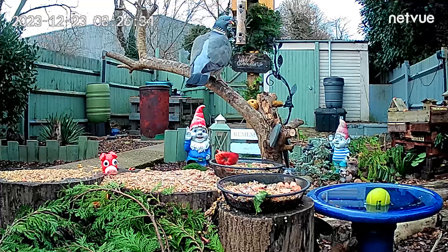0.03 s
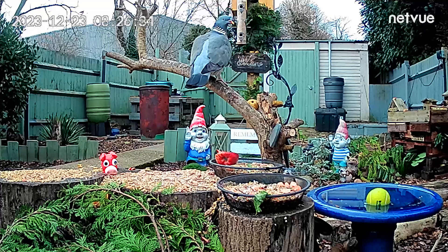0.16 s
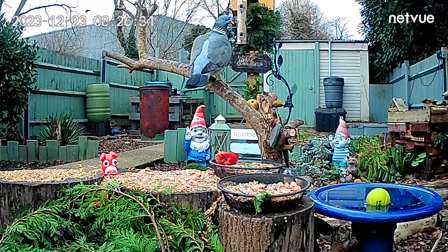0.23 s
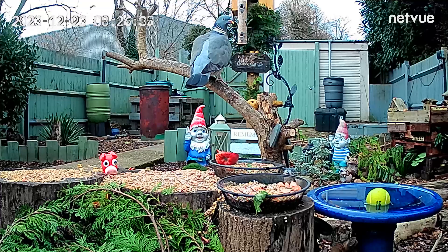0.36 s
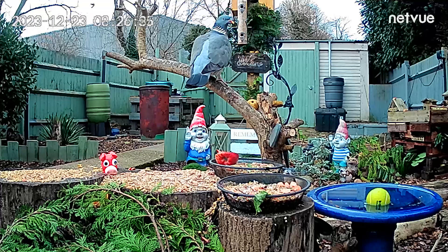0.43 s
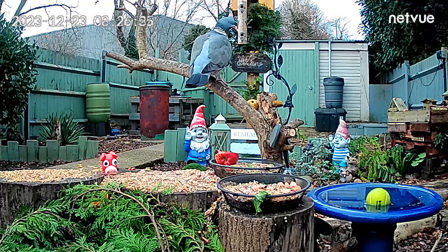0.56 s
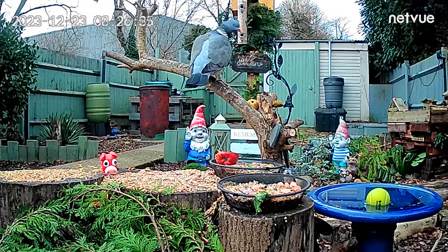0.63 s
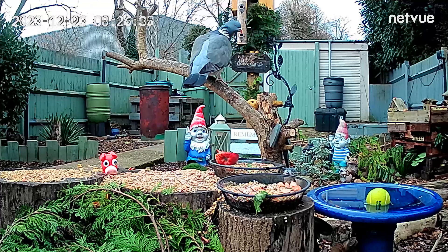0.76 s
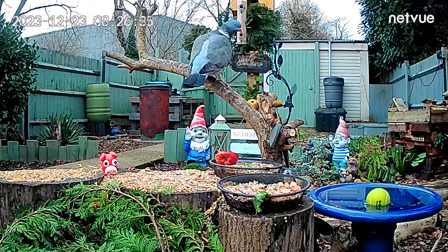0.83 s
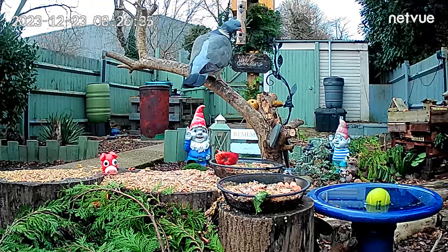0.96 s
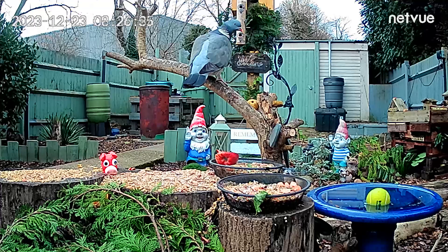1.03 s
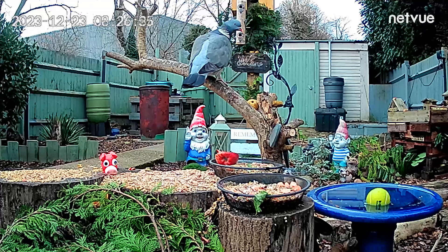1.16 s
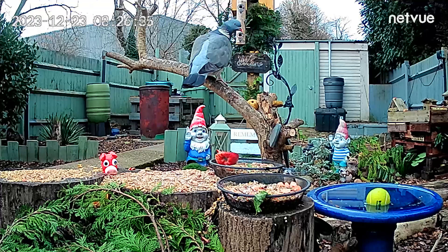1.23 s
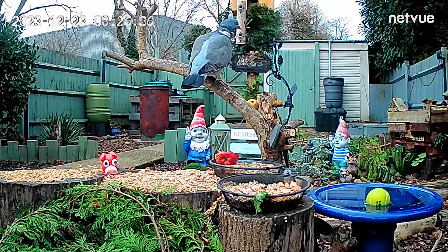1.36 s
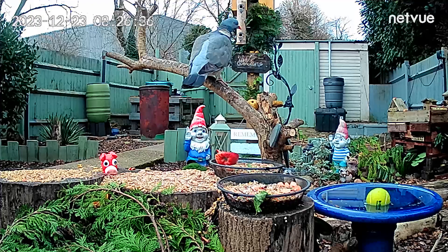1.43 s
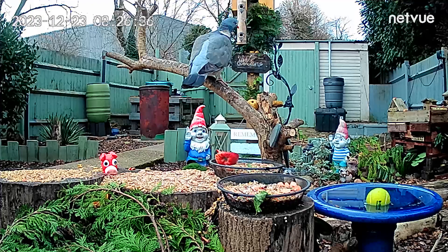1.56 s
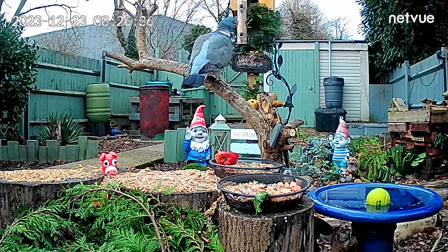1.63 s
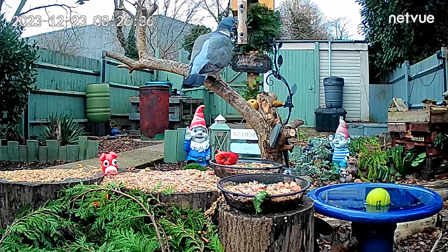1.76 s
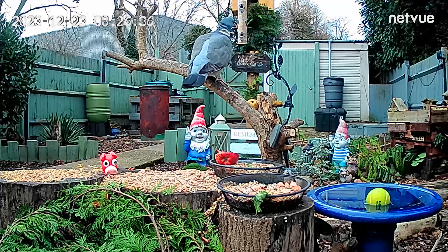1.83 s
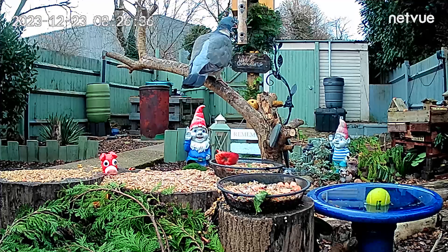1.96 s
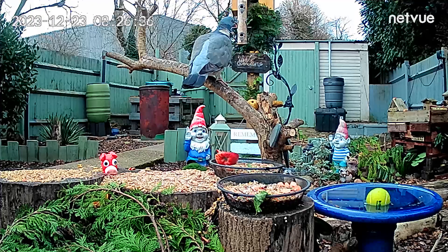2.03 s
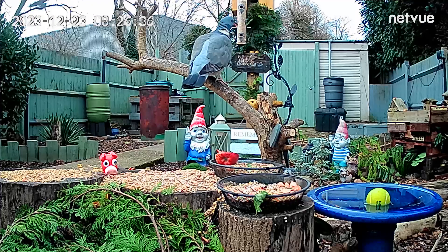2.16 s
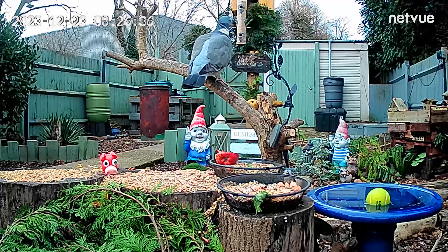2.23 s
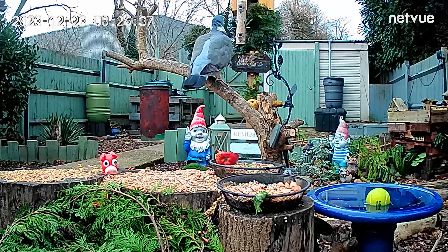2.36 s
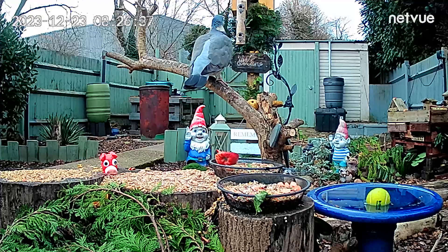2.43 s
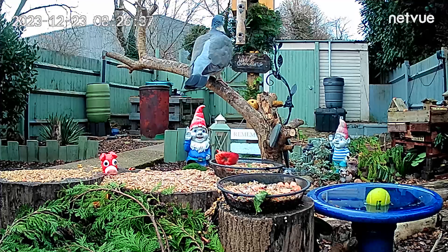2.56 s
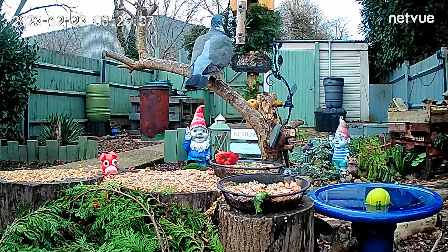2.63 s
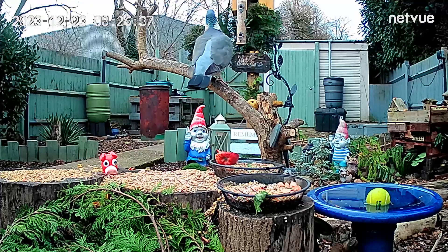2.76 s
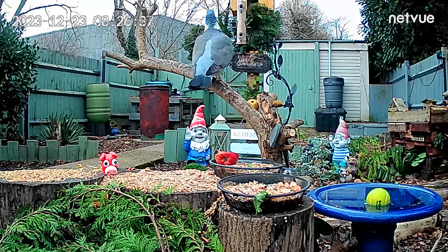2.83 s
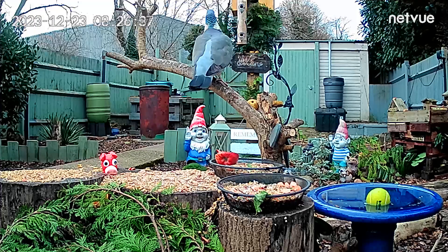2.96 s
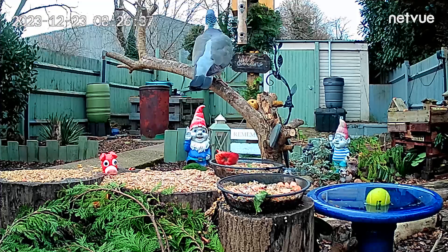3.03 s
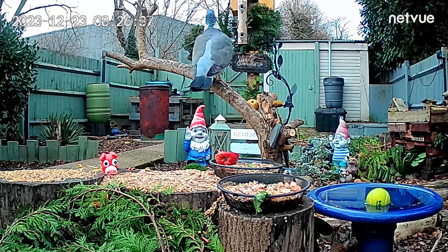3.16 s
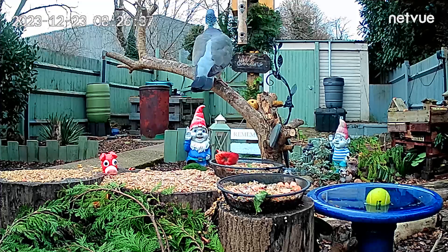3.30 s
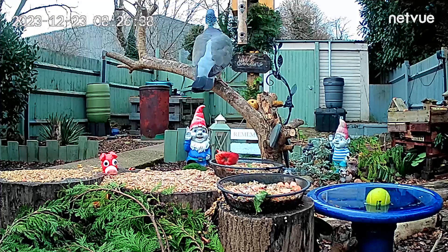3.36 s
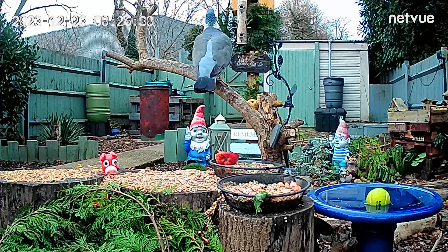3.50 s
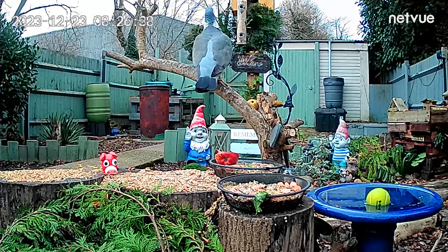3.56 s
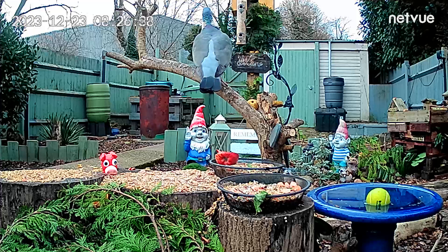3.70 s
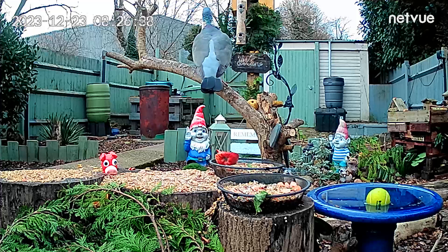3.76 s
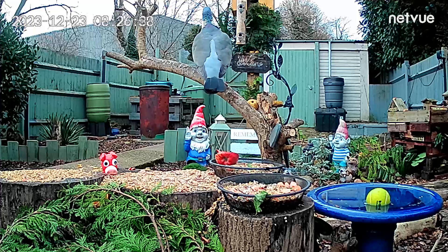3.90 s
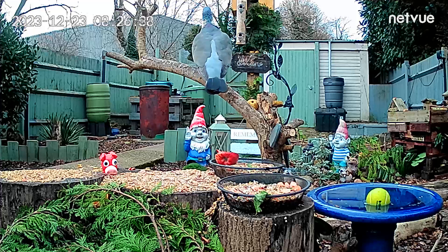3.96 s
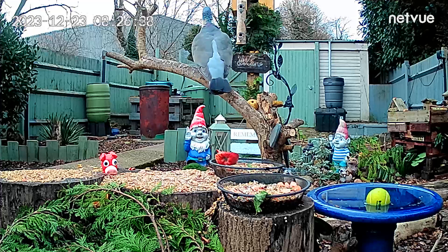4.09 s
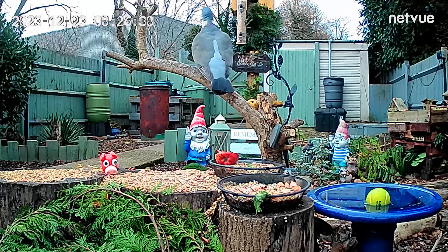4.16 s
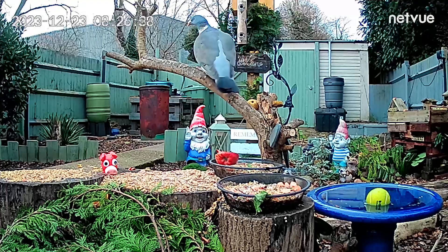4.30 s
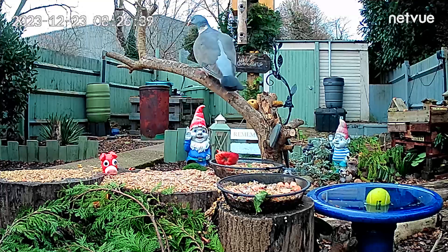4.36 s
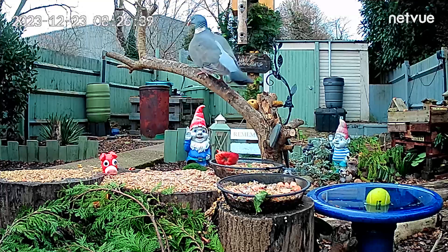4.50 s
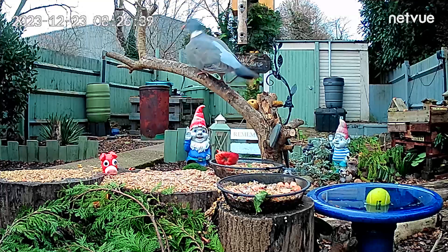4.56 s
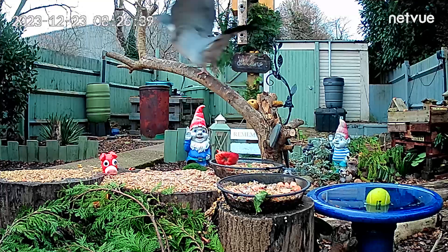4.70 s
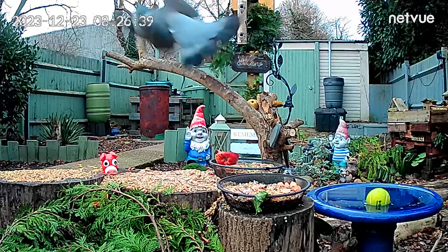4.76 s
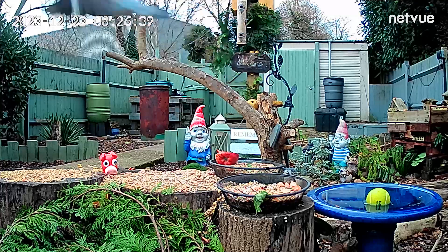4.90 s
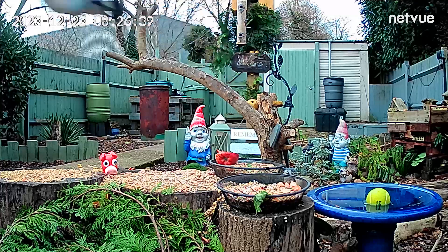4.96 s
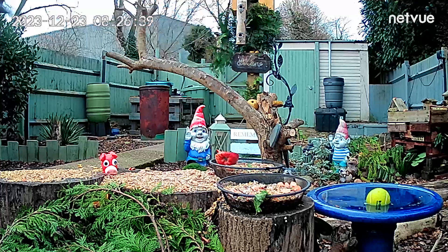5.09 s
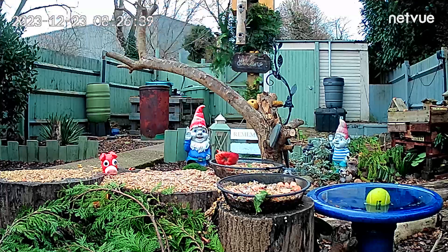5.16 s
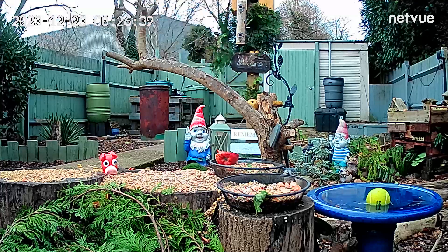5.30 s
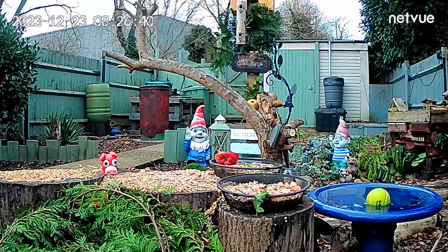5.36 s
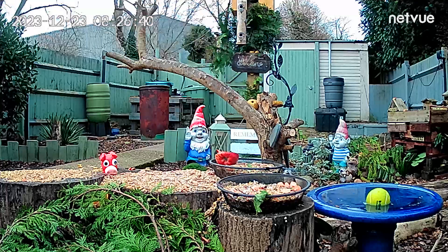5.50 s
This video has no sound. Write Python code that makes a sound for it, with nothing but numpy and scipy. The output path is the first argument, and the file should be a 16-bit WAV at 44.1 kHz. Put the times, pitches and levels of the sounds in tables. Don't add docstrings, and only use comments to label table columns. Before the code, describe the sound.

Outdoor mono sound from a small, cheap microphone: steady airy hiss, brief piercing chirps, a raspy buzz and falling whistles with short echoes off fences. After a lull with low wind bumps and hedge rush, a pigeon close by launches in a fast flurry of dry claps, swishes and puffs of air, brightest at first and duller as it leaves, with heavy low wind rumble underneath and a last hard gust.

```python
import sys
import numpy as np
from scipy import signal
from scipy.fft import rfft, irfft, dct, next_fast_len
from scipy.io import wavfile
from scipy.ndimage import uniform_filter1d

SR = 44100
rng = np.random.default_rng(int(sys.argv[2]) if len(sys.argv) > 2 else 0)


def gain_from_db(level_db):
    decades = np.asarray(level_db, float) / 20
    return 10 ** decades


def transcribe(signal):
    frames = np.atleast_2d(signal).T
    limited = np.clip(frames, -1, 1)
    pcm = np.round(limited * 32767).astype(np.int16)
    wavfile.write(sys.argv[1], SR, pcm)


N = 243431
TIME = np.arange(N) / SR

# time in seconds, buffeting level in dB.
GUST = [(0.0, -47.5), (0.29, -42.5), (1.23, -47), (3.21, -46.5), (3.24, -37), (3.5, -44), (3.61, -29),
        (3.74, -40), (4.03, -23), (4.21, -32), (4.23, -26), (4.46, -24), (4.49, -33.5), (4.86, -14),
        (5.04, -19), (5.32, -14.5), (5.35, -22.5), (5.52, -15.5)]
CALM_DB = -44
# frequency in Hz, gain in dB.
SONG_BAND = [(200, -39), (1500, 19), (7000, 1.5), (7400, 3), (7700, -15.5), (8000, -41)]
# frequency in Hz, density in dB per Hz.
EDGE_SPECTRUM = [(1500, -48.5), (3000, -18), (4000, -17), (4610, -12.5), (5210, -1), (5500, 3),
                 (6510, -16.5), (7120, -24.5), (7460, -24), (8000, -54)]
VANE_SPECTRUM = [(180, -47.5), (300, 0.5), (392, -24), (448, -26.5), (669, -12), (945, -12.5), (1320, -9),
                 (1480, -8), (4300, -13), (5590, -41.5), (9460, -120)]
TIP_SPECTRUM = [(5200, -45), (5900, 5.5), (6600, 1.5), (7200, -4), (7600, -22.5), (8000, -33)]
TAKE_OFF_S = 4.54


def unit(x):
    return x / np.sqrt(np.mean(x ** 2))


def colour(x, points):
    size = next_fast_len(len(x))
    hz, db = np.transpose(points)
    log_hz = np.log(np.arange(size // 2 + 1) * SR / size + 1e-3)
    gain = gain_from_db(np.interp(log_hz, np.log(hz), db, -200, -200))
    return irfft(rfft(x, size) * gain, size)[:len(x)]


def noise(points):
    return unit(colour(rng.standard_normal(N), points))


def walk(rate):
    k = int(SR / rate)
    held = np.repeat(rng.standard_normal(N)[:N // k + 1], k)[:N]
    return unit(uniform_filter1d(uniform_filter1d(held, k), k))


def curve(rows):
    s, *columns = np.transpose(rows)
    return [np.interp(TIME, s, c) for c in columns]


def tone(hz):
    return np.sqrt(2) * np.sin(2 * np.pi * np.cumsum(hz) / SR)


def hump(t, start, length, rise=.5):
    corners = start + length * np.array([0, rise, 1])
    return np.sin(np.pi / 2 * np.interp(t, corners, [0, 1, 0]))


def span(start, length):
    return slice(int(start * SR), int((start + length) * SR))


def fences(x, wet_db, t60):
    t = np.arange(SR // 2) / SR
    tail = rng.standard_normal(len(t)) * gain_from_db(-60 * t / t60) * np.clip(t / 0.012, 0, 1)
    return x + gain_from_db(wet_db) * signal.fftconvolve(x, tail / np.sqrt(np.sum(tail ** 2)))[:N]


def garden():
    # frequency in Hz, density in dB per Hz.
    garden_spectrum = [(71, -26), (120, -4), (226, -13), (315, -16), (481, -14.5), (544, -15.5), (787, -14),
                       (859, -12.5), (988, -15), (1700, -18.5), (1830, -19), (3630, -18), (5500, -9),
                       (7070, -19.5), (8000, -34), (10400, -68.5), (17600, -120)]
    hiss = noise(garden_spectrum)
    upper = colour(hiss, [(1000, 0), (7500, 0)])
    breeze_db = uniform_filter1d(curve(GUST)[0], size=SR // 2) - CALM_DB
    downwash_db = 3.5 * hump(TIME, 4.6, 0.74, .15)
    db = -54 + 0.12 * breeze_db + downwash_db + .7 * walk(6)
    return hiss / np.std(upper) * gain_from_db(db)


def hedge():
    # frequency in Hz, density in dB per Hz.
    hedge_spectrum = [(170, -26), (250, -11), (350, -2.5), (450, -11), (600, -25.5)]
    # start in seconds, length in seconds, level in dB.
    rushes = [
        (-.05, 0.29, -62),
        (0.282, 0.23, -71.5),
        (0.562, 0.19, -70),
        (0.825, 0.1, -64.5),
        (3.6, 0.28, -60),
        (3.821, .11, -53.5),
        (4.05, 0.16, -52),
        (4.184, 0.096, -58),
        (4.25, 0.22, -62.5),
        (4.573, 0.79, -52.5),
    ]
    rush = gain_from_db(-71) + sum(gain_from_db(db) * hump(TIME, s, length, 0.52) for s, length, db in rushes)
    return rush * gain_from_db(2.4 * walk(14)) * noise(hedge_spectrum)


def wind():
    # frequency in Hz, density in dB per Hz.
    buffet_spectrum = [(3, -9.5), (10, -3.5), (25, 2), (40, -5.5), (60, -27), (90, -56.5)]
    flutter_spectrum = [(45, -41), (60, 1), (110, -5.5), (160, -16), (230, -21), (400, -42.5)]
    # start in seconds, length in seconds, change in dB.
    strong_eddies = [(0.106, 0.15, -3.5), (0.233, 0.059, 4), (0.394, 0.088, 5), (0.541, 0.21, 5),
                     (0.838, .08, 5.5), (1.474, 0.078, 6), (1.804, 0.071, 5.5), (3.219, 0.11, 5),
                     (3.342, 0.1, 4), (3.622, 0.089, 3), (3.868, 0.037, 1.5), (4.021, 0.094, 3),
                     (4.214, 0.051, 2), (4.328, .06, 4), (4.589, 0.053, -3.5), (4.862, 0.045, -3.5),
                     (5.011, 0.04, -3.5), (5.148, 0.04, -3), (5.332, 0.041, -10), (5.392, 0.056, 4),
                     (5.449, .04, -4)]
    # start in seconds, length in seconds, pitch in Hz, level in dB.
    thuds = [
        (0.208, 0.18, 73.6, -57),
        (3.242, 0.065, 69.1, -42.5),
        (3.88, 0.075, 80, -52),
        (4.01, 0.048, 72.4, -28.5),
        (4.071, 0.081, 100.7, -44.5),
        (5.089, 0.081, 101.9, -35),
        (0.243, 0.052, 38.16, -38),
    ]
    gust_db = curve(GUST)[0] + sum(db * hump(TIME, s, length) for s, length, db in strong_eddies)
    eddies = noise(buffet_spectrum)
    power = uniform_filter1d(uniform_filter1d(eddies ** 2, size=5000), size=5000)
    eddies /= np.sqrt(np.abs(power) + .05)
    lumps = gain_from_db(gust_db + 0.06 + walk(7.4)) * eddies
    flutter_db = CALM_DB - 11.5 + 0.65 * (gust_db - CALM_DB) + 2 * walk(14)
    flutter_db += 10 * np.log10(uniform_filter1d(eddies ** 2, size=1300) + 0.085)
    for s, length, hz, db in thuds:
        lumps += gain_from_db(db) * hump(TIME, s, length) * tone(hz * (1 + 0.1117 * walk(40)))
    last_s, last_hz = 5.502, 42
    last = np.clip((TIME - last_s) / .006, 0, 1)
    push = gain_from_db(-12.5) * last * np.sin(2 * np.pi * last_hz * (TIME - last_s))
    return lumps * (1 - last) + push + gain_from_db(flutter_db) * noise(flutter_spectrum)


def haze():
    haze_starts = [1.296, 2.17, 2.28, .781, .968, 1.162, 1.745, 2.64, 2.45, 2.325, .91, 3.02, 1.978, 2.018,
                   2.92]
    # fade in seconds, low edge in Hz, high edge in Hz, level in dB.
    haze_bands = [(0.18, 4250, 5600, -45.5), (0.09, 3200, 3800, -44.5), (0.16, 3060, 3600, -53.5),
                  (0.04, 4400, 7800, -48), (0.13, 4850, 7600, -44.5), (0.05, 4850, 6960, -43.5),
                  (0.11, 5400, 7400, -48.5), (0.04, 3700, 4600, -51.5), (0.78, 3300, 4400, -63.5),
                  (0.11, 3250, 3800, -51.5), (0.045, 6200, 5600, -39.5), (.04, 2800, 3500, -58),
                  (.05, 3000, 5600, -52.5), (.03, 3000, 7300, -52), (0.13, 2800, 5500, -64)]
    out, air = np.zeros(N), rng.standard_normal(N)
    for s, (fade, low_hz, high_hz, db) in zip(haze_starts, haze_bands):
        at = span(s, .6)
        t = TIME[at] - s
        band = [(.95 * low_hz, -25), (low_hz, 0), (high_hz, -8), (1.07 * high_hz, -25)]
        out[at] += gain_from_db(db) * unit(colour(air[at], band)) * np.clip(t / 0.0019, 0, 1) * np.exp(-t / fade)
    return out


def buzz():
    # time in seconds, centre frequency in Hz, level in dB.
    buzz_path = [
        (1.714, 7060, -60),
        (1.72, 7000, -48),
        (1.745, 6400, -47),
        (1.768, 6800, -40),
        (1.805, 6700, -40),
        (1.83, 6700, -47),
        (1.855, 6750, -44),
        (1.9, 6850, -49),
        (2.03, 6950, -63),
    ]
    hz, db = curve(buzz_path)
    warble = tone(165 * (1 + .2 * walk(120)))
    sounding = (TIME > buzz_path[0][0]) & (TIME < buzz_path[-1][0])
    depth_hz = 229 * np.clip((TIME - 1.742) / .03, .05, 1)
    swing = depth_hz * (0.7 * warble + 0.3 * walk(460) + 0.17 * walk(60))
    level = gain_from_db(db + 2.0 * walk(90) + 2.9 * walk(300))
    return colour(sounding * level * tone(hz + swing), SONG_BAND)


def chirps():
    # start in seconds, length in seconds, start and end pitch in Hz, level in dB.
    glides = [(.808, 0.008, 7690, 6930, -38), (.824, 0.0088, 7500, 7300, -62),
              (1.077, 0.014, 6440, 6640, -52), (1.1, .02, 6930, 7100, -57), (1.738, 0.02, 7500, 7460, -49),
              (1.826, 0.036, 7400, 6640, -45), (1.878, 0.054, 7400, 6640, -42),
              (1.945, .045, 7100, 7120, -47), (1.002, 0.0041, 7200, 7480, -42),
              (1.006, 0.008, 7400, 6170, -46), (2.181, 0.018, 3420, 3680, -43),
              (2.625, 0.014, 2900, 2920, -68), (2.64, .012, 2860, 2910, -70),
              (2.953, 0.007, 3370, 3400, -57), (3.012, 0.012, 2940, 2940, -66),
              (2.566, 0.013, 3120, 3000, -60.5), (2.572, 0.0082, 3330, 3310, -58),
              (2.617, 0.02, 3490, 3580, -52.5), (2.635, 0.011, 4040, 3300, -46),
              (2.694, 0.019, 3390, 3190, -55.5), (2.745, 0.02, 3330, 3600, -63),
              (2.774, 0.045, 3300, 3390, -68), (2.825, 0.015, 3400, 3600, -67),
              (2.849, 0.015, 3175, 3120, -62), (2.862, 0.021, 3810, 3740, -55),
              (2.872, 0.022, 3400, 3070, -65), (2.935, 0.016, 3550, 3500, -61),
              (2.96, 0.014, 3360, 3580, -66), (3.015, 0.013, 3930, 3410, -52.5),
              (3.025, 0.02, 3640, 3200, -52.5), (3.055, 0.011, 3220, 3240, -63),
              (3.073, 0.019, 2890, 3030, -64), (3.078, 0.027, 3556, 4183, -49.5),
              (3.099, 0.016, 4180, 3470, -49.5), (3.11, 0.018, 2980, 3140, -62)]
    # start, sweep and hold in seconds, top level in dB, low tick in seconds.
    contact_calls = [
        (0.776, 0.0073, 0.011, -42.5, 0.0052),
        (0.962, 0.015, 0.029, -38, 0.0076),
        (1.157, 0.018, 0.019, -49.5, 0.027),
    ]
    low_hz, top_hz, sag_hz_per_s = 4940, 7460, 6100
    notes = list(glides)
    for s, sweep, hold, db, tick in contact_calls:
        notes.append((s, tick, low_hz, 1.06 * low_hz, db - 4.5))
        notes.append((s + 0.003, sweep, 1.08 * low_hz, top_hz, db - 2.5))
        notes.append((s + sweep, hold + 0.17 * sweep, top_hz, top_hz - sag_hz_per_s * hold, db))
    out, hoarse, rasp = np.zeros(N), walk(500), walk(300)
    for s, length, start_hz, end_hz, db in notes:
        at = span(s, length)
        pitch = np.interp(TIME[at], [s, s + length], [start_hz, end_hz])
        rough = (pitch / 7000) ** 2
        rise = 0.5
        if end_hz > 1.1 * start_hz:
            rise = 0.56
        elif end_hz < .95 * start_hz:
            rise = 0.13
        voice = tone(pitch * (1 + 0.015 * rough * hoarse[at]))
        out[at] += gain_from_db(db + rough * rasp[at]) * hump(TIME[at], s, length, rise) * voice
    return colour(out, SONG_BAND)


def whistles():
    # time in seconds, pitch in Hz, level in dB.
    first_whistle = [
        [(1.289, 5050, -50), (1.3, 4600, -45), (1.311, 4350, -41), (1.33, 4230, -40), (1.343, 4075, -34),
         (1.371, 3975, -39), (1.399, 4095, -36), (1.447, 4115, -40), (1.455, 4100, -56)],
        [(1.463, 4110, -48), (1.472, 4105, -38), (1.489, 4100, -45), (1.504, 4095, -46), (1.517, 4080, -66),
         (1.529, 4060, -45), (1.556, 4045, -60), (1.595, 4045, -70), (1.632, 4045, -55)],
        [(1.287, 4170, -44), (1.303, 4080, -29), (1.312, 3800, -41), (1.328, 3690, -32), (1.345, 3670, -40),
         (1.356, 3660, -58), (1.385, 3640, -57), (1.408, 3605, -49), (1.422, 3600, -64)],
        [(1.443, 3540, -60), (1.454, 3545, -53), (1.476, 3630, -56), (1.5, 3700, -59), (1.52, 3600, -74),
         (1.535, 3600, -54), (1.56, 3585, -61), (1.59, 3560, -68)],
    ]
    second_whistle = [
        [(2.168, 3790, -45), (2.173, 3680, -43), (2.18, 3400, -44), (2.187, 3400, -54), (2.197, 3400, -37),
         (2.228, 3345, -32.5), (2.259, 3240, -36), (2.275, 3130, -47), (2.292, 3000, -52)],
        [(2.258, 3500, -52), (2.27, 3540, -47), (2.28, 3420, -43), (2.291, 3515, -44), (2.303, 3595, -35),
         (2.312, 3500, -41), (2.324, 3390, -46)],
        [(2.332, 3370, -44), (2.345, 3420, -43), (2.367, 3460, -41), (2.379, 3385, -40), (2.39, 3400, -44),
         (2.407, 3430, -43), (2.433, 3340, -42), (2.443, 3330, -52)],
        [(2.447, 3440, -56), (2.46, 3430, -53), (2.49, 3410, -56), (2.501, 3350, -46), (2.512, 3300, -50),
         (2.525, 3230, -60)],
        [(2.292, 3000, -52), (2.31, 3050, -58), (2.35, 3200, -54), (2.37, 3200, -52), (2.418, 3100, -56),
         (2.445, 2900, -64), (2.465, 2700, -53), (2.485, 2600, -60), (2.52, 2300, -66)],
    ]
    out, tremor, shake = np.zeros(N), walk(90), walk(110)
    for rows in first_whistle + second_whistle:
        s, hz, db = np.transpose(rows)
        at = span(s[0] - .003, s[-1] - s[0] + .006)
        t = TIME[at]
        gate = np.clip(np.minimum(t - s[0], s[-1] - t) / .006 + .5, 0, 1)
        level_db = np.interp(t, s, db)
        depth = np.clip((-42 - level_db) / 7, 0, .4)
        beads = 1 - depth * tone(11 * (1 + walk(25)[at])) ** 2 / 2
        voice = tone(np.interp(t, s, hz) * (1 + .0025 * (1 + 2 * depth) * tremor[at]))
        out[at] += gate * beads * gain_from_db(level_db + 3 + 1.7 * shake[at]) * voice
    return out


def puffs():
    # start in seconds, length in seconds, pitch in Hz, level in dB.
    air_puffs = [(4.685, 0.038, 412, -43.5), (4.687, .025, 798, -47.5), (4.752, 0.025, 704, -48),
                 (4.777, 0.013, 316, -39), (4.778, 0.022, 675, -42), (4.804, .025, 218.7, -40.5),
                 (4.965, .02, 1182, -44), (5.205, .02, 1313, -54), (4.897, 0.042, 400, -48),
                 (4.795, .035, 666, -39), (4.799, 0.039, 1316, -47), (4.872, 0.024, 305, -41),
                 (4.886, 0.042, 674, -41), (4.907, 0.022, 805, -44), (4.93, 0.039, 668, -38),
                 (4.964, .022, 855, -44.5), (4.965, 0.022, 474, -46), (5.002, .03, 648, -51),
                 (5.049, .026, 690, -42), (5.038, 0.033, 257, -49.5), (5.092, 0.025, 848, -48),
                 (5.074, 0.026, 697, -46), (5.098, 0.026, 558, -44.5), (5.154, 0.02, 733, -46),
                 (5.184, 0.055, 667, -42.5), (5.23, 0.028, 685, -40.5), (5.372, .03, 744, -55.5)]
    out = np.zeros(N)
    wobble, breathy, jet = walk(150), walk(200), rng.standard_normal(N)
    for s, length, hz, db in air_puffs:
        at = span(s, length)
        sway = 1 + 0.046 * wobble[at]
        band = [(0.65 * hz, -20), (.85 * hz, 0), (1.1 * hz, -2), (1.9 * hz, -20)]
        breath = unit(colour(jet[at], band))
        overtone = tone(1.22 * hz * (sway + 0.093 * rng.standard_normal()))
        air = tone(hz * sway) + gain_from_db(-11.5) * overtone + gain_from_db(-4.5) * breath
        out[at] += gain_from_db(db + 2.0 * breathy[at]) * hump(TIME[at], s, length) * air
    return out


def swishes():
    # start and hold in seconds, level, vanes below 4 kHz and tips above 6 kHz in dB.
    strokes = [(0.911, 0.01, -46.5, -12, 2), (1.969, 0.02, -47, -9.5, -10), (1.994, 0.02, -44.5, -9.5, -7),
               (2.023, 0.022, -47, -10, -9), (2.073, .006, -55, -10, -11), (4.396, 0.0098, -48.5, -10, -2),
               (4.536, 0.003, -54.5, 0, 5), (4.557, 0.0037, -58, -10, 16), (4.614, 0.0026, -40.5, -1, 6),
               (4.637, .02, -39, -3, 3.5), (4.656, 0.022, -38, 1, 1), (4.687, 0.037, -36.5, -2, 2),
               (4.742, 0.0072, -47, 2, -6), (4.783, 0.009, -37.5, 8.5, 4.5),
               (4.801, 0.011, -42.5, 0.5, 0.5), (4.822, 0.0055, -40.5, 4, -4.5),
               (4.876, 0.028, -45, 4.5, 3), (4.9, .008, -40, 5, -1), (4.917, 0.021, -35.5, -1.5, -3),
               (4.943, .016, -41, -4, -9), (4.964, .02, -42.5, -1.5, -9), (4.99, 0.026, -39, -6, -10),
               (5.04, 0.0044, -46, 9, -6), (5.055, 0.012, -37.5, -0.5, -13), (5.081, 0.027, -47.5, 10, -21),
               (5.121, 0.019, -43.5, 2.5, -11), (5.179, 0.012, -43.5, -2, -12.5),
               (5.208, 0.017, -44, 2, -13), (5.238, 0.015, -49, 6, -15.5), (5.377, 0.015, -48.5, 5.5, -4.5)]
    spectra = (EDGE_SPECTRUM, VANE_SPECTRUM, TIP_SPECTRUM)
    edge, vane, tips = (noise(c) * gain_from_db(3.0 * walk(400) + 1.8 * walk(70)) for c in spectra)
    patch, patchy_vane = walk(45), np.zeros(N)
    for hz in 150 * 1.5 ** np.arange(10):
        patchy_vane += colour(vane, [(hz, 0), (1.5 * hz, 0)]) * gain_from_db(3 * np.roll(patch, int(7 * hz)))
    rise_s, fade_s, sag_db_per_s = 0.005, 0.013, 82
    out = np.zeros(N)
    for s, hold, db, vane_db, tips_db in strokes:
        at = span(s, .25)
        t = TIME[at] - s
        fade = np.exp(-np.clip(t - rise_s - hold, 0, None) / fade_s)
        shape = np.clip(t / rise_s, 0, 1) * fade * gain_from_db(-sag_db_per_s * np.minimum(t, hold))
        tilt_db = np.clip(7 - 25 * (s - TAKE_OFF_S), -3, 5) * (s > TAKE_OFF_S)
        tilt = [(1500, -tilt_db), (4800, -tilt_db), (6200, tilt_db), (8000, tilt_db)]
        feathers = colour(edge[at], tilt) + gain_from_db(vane_db - 12.5) * patchy_vane[at] + gain_from_db(tips_db - 7) * tips[at]
        out[at] += gain_from_db(db - 1.5) * shape * feathers
    return out


def claps():
    # start in seconds, peak in dB, relative part at 1-3.5 kHz in dB.
    tip_claps = [(0.9078, -32, -45), (1.981, -43, -10), (2.021, -44, -10), (2.04, -47.5, -9.5),
                 (4.5393, -31, -20.5), (4.556, -37.5, -25), (4.609, -32, -21.5), (4.6125, -32, -11),
                 (4.633, -26, -20.5), (4.6613, -29.5, -7.5), (4.714, -28.5, -24), (4.7831, -23.5, -10),
                 (4.794, -31.5, -11), (4.9119, -23, -13.5), (4.9154, -21.5, -28), (4.9678, -27.5, -6.5),
                 (5.0451, -27, -12.5), (5.0607, -26.5, -16.5), (5.1171, -23, -15), (5.18, -37.5, -15),
                 (5.204, -34, -10.5), (5.2101, -30.5, -12.5), (5.3787, -41, -11)]
    edge, vane, tips = noise(EDGE_SPECTRUM), noise(VANE_SPECTRUM), noise(TIP_SPECTRUM)
    out = np.zeros(N)
    for s, db, vane_db in tip_claps:
        at = span(s, .04)
        t = TIME[at] - s
        crack = np.clip(t / .0005, 0, 1) * np.exp(-t / .0026)
        tips_db = -3 - 23 * max(s - TAKE_OFF_S, 0)
        snap = crack * (edge[at] + gain_from_db(tips_db) * tips[at])
        out[at] += gain_from_db(db + 0.5) * (snap / np.abs(snap).max() + gain_from_db(vane_db - 0.5) * crack * vane[at])
    return out


def wings():
    return puffs() + swishes() + claps()


def scene():
    notes = chirps()
    low_notes = colour(notes, [(100, 0), (4500, 0)])
    birds = haze() + fences(buzz(), -2.5, 0.13) + fences(whistles(), -15.5, 0.37)
    birds += fences(low_notes, -13, 0.055) + fences(notes - low_notes, -7.5, 0.044)
    near = fences(wings(), -20, .12)
    return (garden() + hedge() + wind() + birds + near)[None]


def camera_rounding(x, coarse, size=2048):
    half, window = size // 2, np.sin(np.pi * (np.arange(2 * size) + .5) / (2 * size))
    padded = np.pad(x, (size, 2 * size - len(x) % size))
    blocks = np.lib.stride_tricks.sliding_window_view(padded, 2 * size)[::size] * window
    a, b, c, d = np.split(blocks, 4, axis=1)
    lines = dct(np.hstack([-c[:, ::-1] - d, a - b[:, ::-1]]), type=4, norm="ortho")
    power = np.abs(uniform_filter1d(lines ** 2, size=11, axis=1)) + 1e-16
    power = np.minimum(power, gain_from_db(-40) * np.sqrt(power))
    held_power = np.minimum(power, 3 * np.roll(power, 1, axis=0))
    bass_finer = np.clip((np.arange(size) / 60) ** 3, .001, 1)
    step = coarse * np.sqrt(held_power) * bass_finer
    u = dct(np.round(lines / step) * step, type=4, norm="ortho")
    unfolded = np.hstack([u[:, half:], -u[:, :half - 1:-1], -u[:, half - 1::-1], -u[:, :half]])
    back = unfolded * window
    return (back[:-1, size:] + back[1:, :size]).ravel()[:len(x)]


def top_cut(x):
    return signal.sosfilt(signal.butter(12, 9200, fs=SR, output="sos"), x)


def record(dry):
    # start in seconds, end in seconds, lower limit in Hz.
    lost_tops = [
        (.88, .94, 7850),
        (1.03, 1.13, 7800),
        (1.21, 1.3, 7600),
        (1.33, 1.38, 7800),
        (1.59, 1.63, 7700),
        (1.72, 1.85, 7850),
        (1.85, 2.085, 7600),
        (4.85, 4.945, 7350),
        (4.945, 4.97, 6800),
    ]
    # start in seconds, end in seconds, low and high edge in Hz.
    lost_bands = [
        (1.31, 1.375, 3050, 3350),
        (2.155, 2.19, 2600, 2900),
        (4.855, 4.895, 3400, 3800),
        (4.865, 4.882, 3100, 4100),
        (4.86, 4.875, 1600, 2100),
        (4.953, 4.97, 2950, 3250),
    ]
    # frequency in Hz, gain in dB.
    upsampler_response = [(1, 2.5), (7400, -2.5), (7700, -4), (8000, -6.5), (8400, -14.5), (8800, -29),
                          (9100, -45), (9400, -83.5)]
    rate_hz = 16000
    x = colour(camera_rounding(dry[0], 1.7), [(1e-4, 0), (rate_hz / 2, 0)])
    gaps = [(*row, rate_hz / 2) for row in lost_tops] + list(lost_bands)
    for start, end, hz, top_hz in gaps:
        at = span(start - .05, end - start + .1)
        gate = np.clip(np.minimum(TIME[at] - start, end - TIME[at]) / .008 + .5, 0, 1)
        tapered = x[at] * np.hanning(len(gate)) ** .1
        x[at] -= gate * colour(tapered, [(hz - 40, -40), (hz, 0), (top_hz, 0), (top_hz + 40, -40)])
    mirror = 2 * x * np.cos(2 * np.pi * rate_hz * TIME)
    finished = colour(x + mirror, upsampler_response)[None]
    return top_cut(finished)


dry = scene()
out = record(dry)
transcribe(out)
```